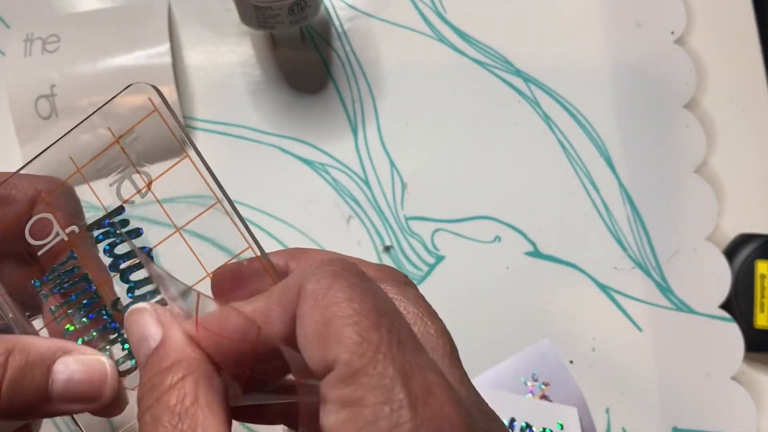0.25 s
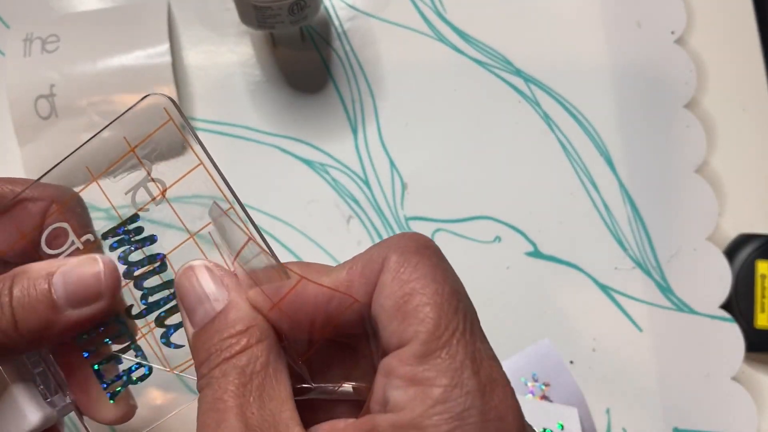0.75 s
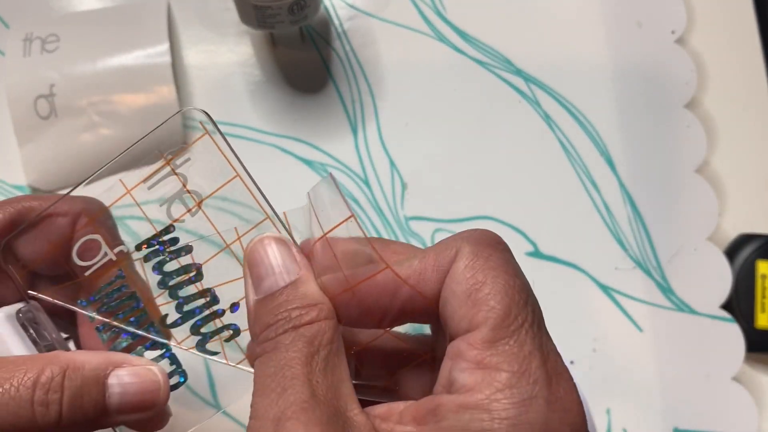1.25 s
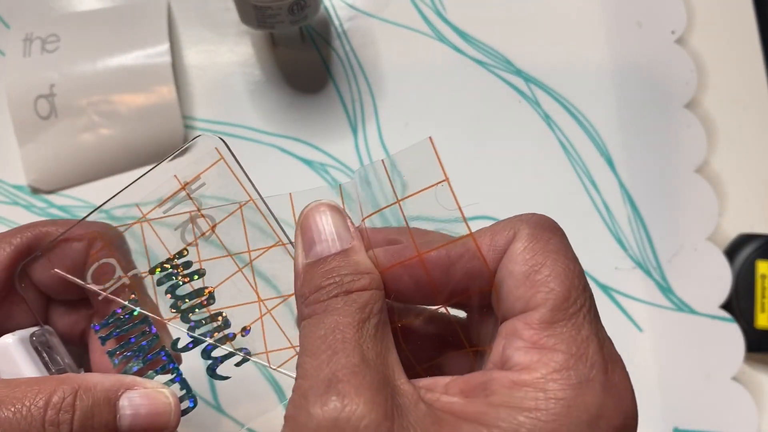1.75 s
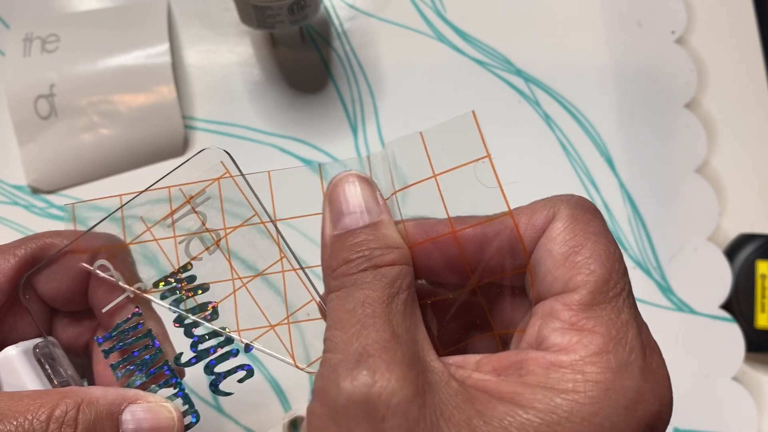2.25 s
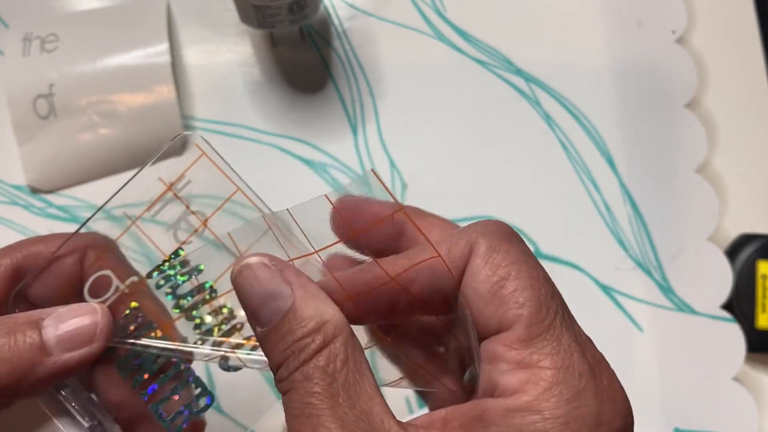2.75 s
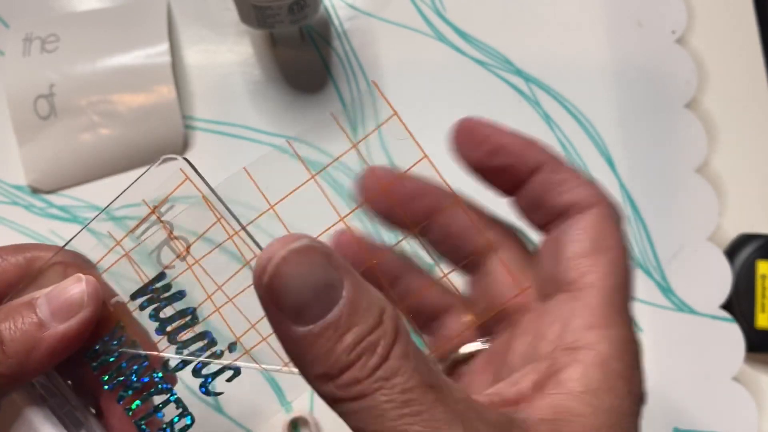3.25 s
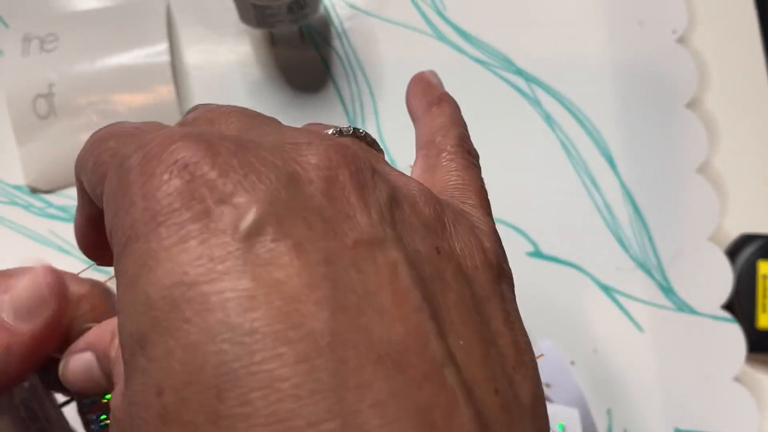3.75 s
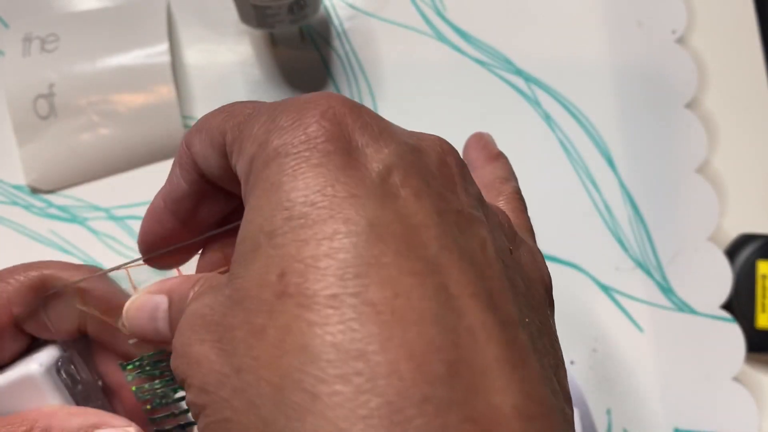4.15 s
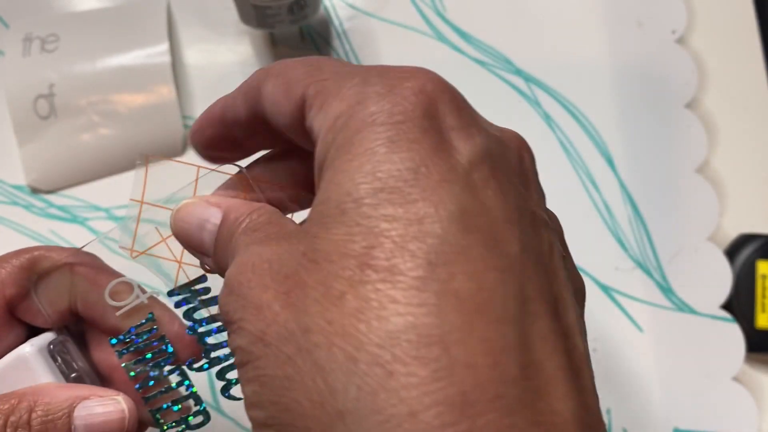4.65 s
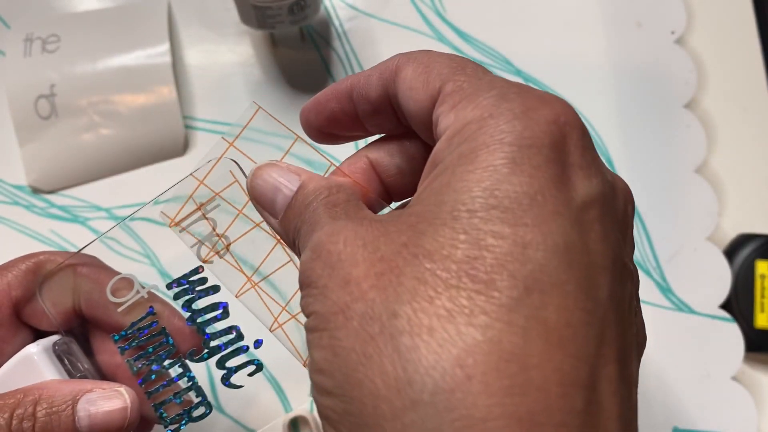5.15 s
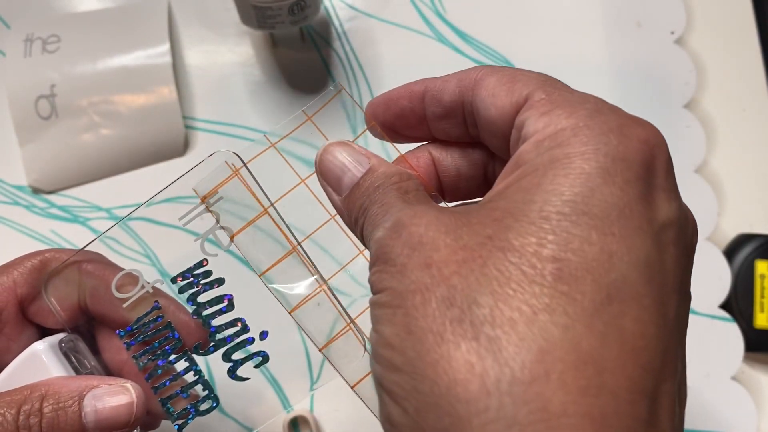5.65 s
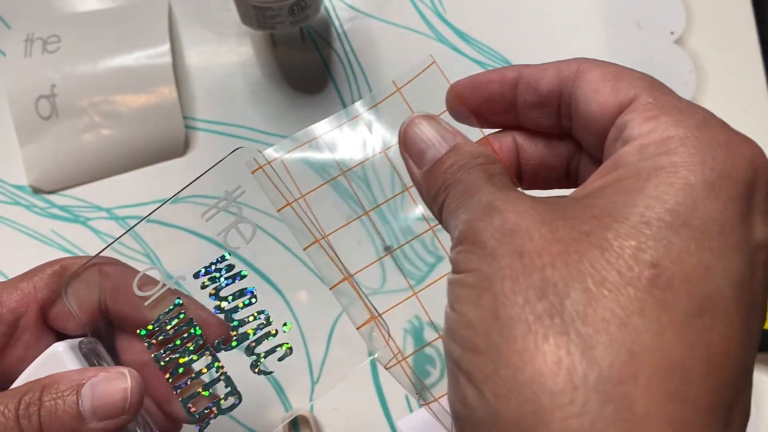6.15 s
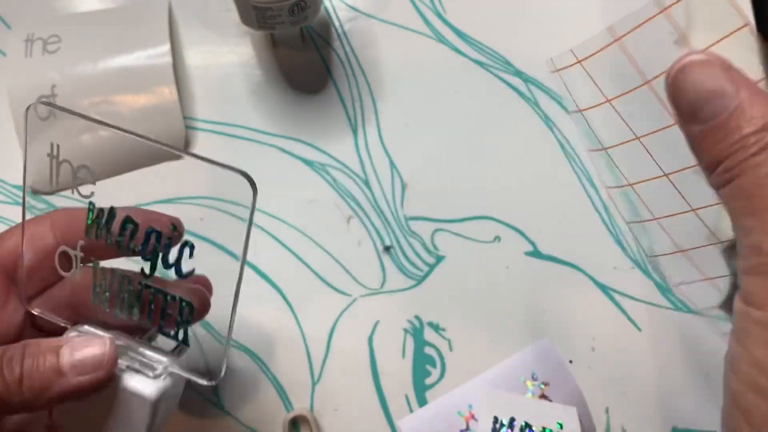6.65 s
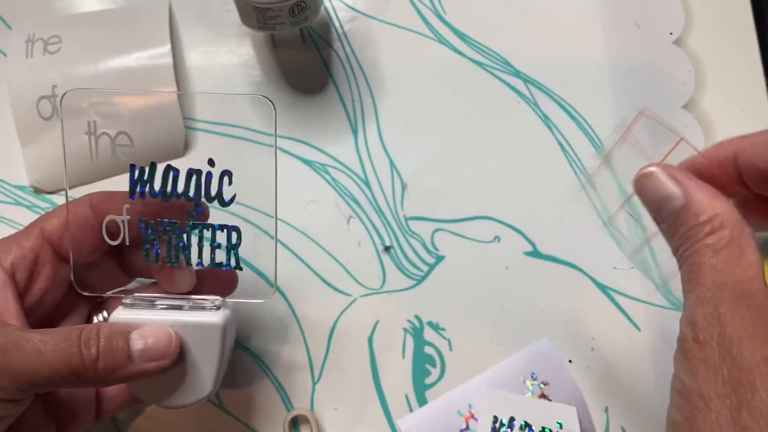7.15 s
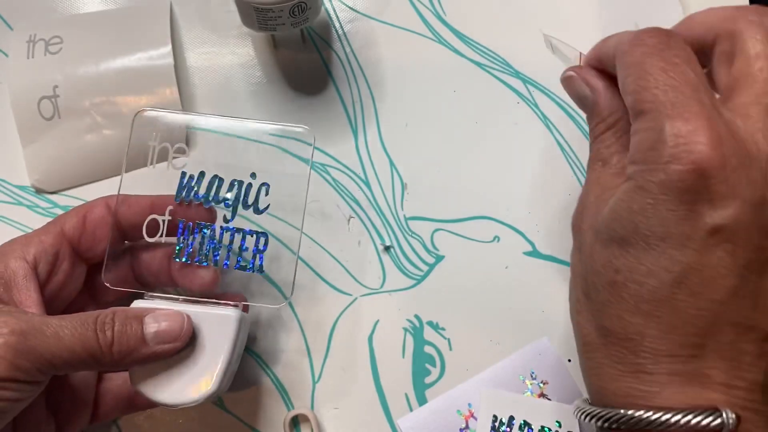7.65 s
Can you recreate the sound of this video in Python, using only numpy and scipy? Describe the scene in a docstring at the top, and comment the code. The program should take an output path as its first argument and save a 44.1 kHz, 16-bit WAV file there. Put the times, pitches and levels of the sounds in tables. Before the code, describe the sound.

Close, dry crackles and bright ticks as adhesive film is slowly pulled from hard plastic, with brief rustling scrapes and bumps over faint room hum.

```python
"""Sticky film peeled off a panel

Sticky plastic film is pulled slowly off a small clear panel close by, in stereo.
Glue lets go in a fine fizz (treble noise in tiny grains) and in snaps and ticks (short dying noise bursts).
Film scrapes and rustles (grainy noise through the panel's modes); fingers rumble and knock (low noise).
A quiet room hums behind (coloured noise, one narrow resonance) and answers with a short noise tail.
"""
import sys
import numpy as np
from scipy import signal
from scipy.fft import rfft, irfft, next_fast_len
from scipy.io import wavfile
from scipy.ndimage import uniform_filter1d

SR = 44100
rng = np.random.default_rng(int(sys.argv[2]) if len(sys.argv) > 2 else 0)


def wrap_up_sound(samples):
    """Save the sound to the file named by the first command line argument, as 16-bit audio."""
    columns = np.atleast_2d(samples).T
    # keep every value between -1 and 1, then stretch to whole-number steps
    tamed = np.clip(columns, -1, 1)
    steps = np.round(tamed * 32767).astype(np.int16)
    wavfile.write(sys.argv[1], SR, steps)


def convert_level_to_amplitude(level_db):
    """Map a level in decibels to its linear amplitude factor."""
    exponent = np.asarray(level_db, float) / 20
    return 10 ** exponent


N = 348831

# Room tone spectrum. Each row: frequency in Hz, relative density in dB per Hz.
AIR_TONE = [(32, -25.5), (62, 0), (92, -12), (125, -7.5), (250, -21), (700, -29), (2000, -40),
            (6500, -35.5), (12000, -48.5)]
AIR_DB, HUM_HZ, HUM_WIDTH_HZ, HUM_DB = -67, 241, 0.49, -81
# Likeness of left and right in room tone and tail, before the stereo is set; above 5.5 kHz they carry
# one sound. Each row: frequency in Hz, correlation (1 = same).
SIDE_LIKENESS = [(100, .97), (600, .5), (4900, .5), (5500, 1.0)]
# Modes of the stiff panel in cupped hands. Each row: frequency in Hz, width in Hz, gain in dB.
PANEL_MODES = [(650, 350, -5), (1250, 400, 0), (2600, 400, 4), (3800, 500, -2), (4700, 600, 0)]
# Treble colour of torn glue. Each row: frequency in Hz, gain in dB.
GLUE_TREBLE = [(4200, -14), (6000, 0), (9000, -7), (15600, -7), (16300, -35)]
# The steady pull. Each row: time in seconds, film scraping in dB, glue fizz in dB.
PULL = [(0.2, -66.5, -69), (0.55, -64.5, -57), (1.05, -72, -57.5), (1.5, -79.5, -50), (1.998, -70.5, -61),
        (2.269, -91, -72), (2.6, -79.5, -64), (3.0, -69.5, -58), (3.57, -94.5, -74), (3.87, -77.5, -70.5),
        (4.099, -65, -64.5), (4.6, -61.5, -63), (5.1, -75.5, -65.5), (5.9, -66.5, -64.5),
        (6.279, -80, -69.5), (6.6, -58, -62.5), (7.049, -88.5, -98), (7.649, -103, -74.5)]
# A hand regrips and the film creases. Each row: peak time in seconds, scraping in dB, fizz in dB,
# fingers shifting the panel in dB, time to fade 30 dB in seconds (a negative one leaves the row near silent).
GRIPS = [(0.029, -52.5, -48.5, -63, 0.14), (2.329, -60, -72, -53, 0.72), (2.389, -76, -82, -55, -0.04),
         (2.55, -56, -58, -65, -0.02), (3.189, -33.5, -51, -37.5, 0.03), (3.631, -50, -56.5, -47, 0.25),
         (3.94, -45, -62, -47.5, 0.034), (4.666, -48, -74, -37.5, 0.16), (4.87, -60, -72, -49, 0.37),
         (5.598, -63, -66, -48, -0.03), (6.371, -30, -50.5, -39, 0.11), (7.15, -45.5, -38, -52, 0.09),
         (7.75, -38, -48, -43.5, 0.1)]
GRIP_RISE_DB_PER_S = 420
# Glue letting go or a crease flipping. Each row: start in seconds, crack in dB, thump in dB above the crack,
# treble in dB above the crack, ring of the loose film in Hz.
SNAPS = [(0.0233, -22.5, -18, 13, 2530), (0.0796, -21, -15.5, 2.5, 7300), (0.5934, -31.5, -24.5, -2, 3660),
         (0.7963, -26, -23, 5, 6230), (0.893, -31, -16, -3, 3660), (1.3157, -36, -11.5, 12, 4000),
         (1.4, -31.5, -15.5, 0.5, 6200), (1.4175, -18, -18, 5, 5360), (1.6435, -37, -2, 14.5, 5300),
         (2.307, -36, 2, -16.5, 4040), (2.3812, -41.5, 2, -4.5, 526), (2.4946, -18, -12.5, -2, 3110),
         (2.836, -45.5, 4.5, -1, 293), (2.8519, -35.5, -6, -6, 3170), (3.0359, -39, -12.5, -9.5, 5340),
         (3.057, -33.5, -7.5, -5, 4450), (3.0735, -35, -10.5, -11, 3780), (3.17, -21, -19, -1.5, 5290),
         (3.6841, -38, -11.5, 5.5, 6000), (3.757, -26, -14, 7.5, 5940), (3.7961, -41.5, 1.5, -3.5, 376),
         (3.9183, -18.5, -14, -6, 3820), (3.924, -22, -4, -17, 5290), (4.0582, -44.5, -13.5, 0, 5700),
         (4.2097, -51, -9.5, -14, 4900), (4.633, -39, 1, 6.5, 2700), (4.9715, -38, -1.5, -10.5, 2740),
         (5.226, -30, -9.5, -1, 2530), (5.3588, -31.5, -3.5, 13, 6930), (5.5995, -35, -4, 4, 2580),
         (5.9829, -32.5, -3.5, -8, 2600), (6.326, -17, -9.5, 0.5, 7430), (6.3508, -34.5, 13.5, 7.5, 6700),
         (6.378, -15, -12.5, 2.5, 4720), (6.3815, -12, -26, 1, 6800), (6.4134, -31, -15.5, -6, 2570),
         (6.7231, -33, -7.5, -1.5, 3345), (7.131, -22, -24, 3.5, 6130), (7.1609, -25, -16, -9.5, 6150),
         (7.7324, -22, -16.5, 7.5, 4260), (7.883, -43, -14.5, -1, 3500), (7.903, -46, 0, -4.5, 2860)]
RING_MAX_WIDTH_HZ = 900
# Single threads of glue tearing, nearly all treble. Each row: start in seconds, treble in dB.
TICKS = [(0.396, -37), (0.429, -38.5), (0.4675, -38), (0.515, -36.5), (0.542, -33.5), (0.5659, -21.5),
         (1.189, -37.5), (1.275, -41.5), (1.3827, -29), (1.517, -37.5), (1.5409, -31), (1.55, -38.5),
         (1.675, -31.5), (1.702, -35.5), (1.713, -39.5), (1.8051, -31.5), (1.844, -39), (1.864, -36),
         (1.932, -32), (1.9831, -24.5), (2.3238, -26.5), (4.3699, -39), (4.693, -37.5), (4.984, -37),
         (6.367, -28.5), (7.716, -40.5)]
TICK_CRACK_DB, TICK_THUMP_DB, TICK_RING_HZ = -19, -14.5, 5600  # crack re treble, thump re crack
# Fingers or panel knocking dully. Each row: start in seconds, thump in dB, ring in Hz.
KNOCKS = [(0.872, -55.5, 1110), (0.9692, -50.5, 587), (1.758, -53, 1710), (1.992, -48, 700),
          (2.288, -49.5, 504), (2.4543, -45, 1080), (2.7068, -52, 270), (3.661, -42.5, 900),
          (4.963, -48.5, 1180), (5.684, -44.5, 1100), (6.0592, -25.5, 1110), (6.1239, -40, 920),
          (7.527, -44, 240)]
KNOCK_CRACK_DB, KNOCK_TREBLE_DB = -12, -3.5  # crack re thump, treble re crack
# Room decay. Each row: frequency in Hz, time to fall 60 dB in seconds.
ROOM_DECAY = [(250, 0.12), (4000, 0.21), (14000, 0.06)]
# The film drags and crumples. Each row: start in seconds, level in dB, length in seconds, loudest colour in Hz.
RUSTLES = [(3.108, -36, 0.053, 5000), (3.182, -32, 0.078, 4370), (3.589, -41.5, 0.05, 1940),
           (4.615, -43, 0.04, 2420), (6.297, -44, 0.037, 2640), (6.63, -52.5, 0.11, 1970),
           (6.8, -54, 0.044, 4130), (6.877, -59.5, 0.041, 1400), (7.069, -49.5, 0.053, 1930),
           (7.682, -50, 0.046, 2400), (7.767, -35, .022, 3870)]
# Phase between left and right. Each row: frequency in Hz, lead of the left in radians.
LEFT_LEAD = [(80, 0), (950, .4), (2400, -.8), (4600, -.9), (5500, -np.pi)]
# Balance between left and right. Each row: frequency in Hz, left minus right in dB.
LEFT_LOUDER = [(100, .2), (1600, 1.8), (5500, 0)]


def evened(x):
    """Scales to rms 1."""
    return x / np.sqrt(np.mean(x ** 2) + 1e-20)


def read(points, hz):
    """Reads a table on a log-frequency axis."""
    f, value = np.transpose(points)
    return np.interp(np.log(hz + 1), np.log(f + 1), value)


def coloured(x, points):
    """Filters by a table of dB over frequency."""
    size = x.shape[-1]
    hz = np.fft.rfftfreq(size, 1 / SR)
    return irfft(rfft(x) * convert_level_to_amplitude(read(points, hz)), size)


def band(x, low_hz, high_hz):
    """Causal band-pass."""
    sos = signal.butter(2, [low_hz, high_hz], "band", fs=SR, output="sos")
    return signal.sosfilt(sos, x)


def ring(x, hz, width_hz):
    """One damped mode of gain 1."""
    r = np.exp(-np.pi * width_hz / SR)
    return 2 * signal.lfilter([1 - r], [1, -r * np.exp(2j * np.pi * hz / SR)], x).real


def diffuse(pair):
    """Mixes two unrelated sounds into a left and right as alike as SIDE_LIKENESS says."""
    hz = np.fft.rfftfreq(pair.shape[1], 1 / SR)
    same = np.clip(read(SIDE_LIKENESS, hz), -1, 1)
    a, b = rfft(pair)
    return irfft([a, same * a + np.sqrt(1 - same ** 2) * b], pair.shape[1])


def air():
    """Room tone with a faint wavering hum, noise through a very narrow resonance."""
    tone = evened(coloured(diffuse(rng.standard_normal((2, N))), AIR_TONE))
    hum = evened(ring(rng.standard_normal(N), HUM_HZ, HUM_WIDTH_HZ))
    return convert_level_to_amplitude(AIR_DB) * tone + convert_level_to_amplitude(HUM_DB) * hum


def wander(rms_db):
    """Uneven motion: a gain that drifts at random, several times a second."""
    drift = uniform_filter1d(rng.standard_normal(N), size=2500)
    return convert_level_to_amplitude(rms_db * evened(uniform_filter1d(drift, size=2500)))


def grains(per_s, spread_db, smooth, peak_s):
    """Tiny slips of random size over a smooth noise; each swells for peak_s, then dies."""
    size_db = spread_db * np.minimum(rng.exponential(1, N), 4)
    slips = (rng.random(N) < per_s / SR) * convert_level_to_amplitude(size_db)
    t = np.arange(2048) / (peak_s * SR)
    clumps = signal.oaconvolve(slips, t * np.exp(-t))[:N]
    return evened(evened(clumps) + smooth) * rng.standard_normal(N)


def panel(x, drift_db=0):
    """Panel and cupped hands ring in a few broad modes; with drift_db moving hands swell each alone."""
    out = 0
    for hz, width_hz, db in PANEL_MODES:
        drift = wander(drift_db) if drift_db else 1
        out = out + convert_level_to_amplitude(db) * drift * ring(x, hz, width_hz)
    return band(out, 200, 6000)


def grips():
    """Gains of scrape, fizz and fingers: each grip swells fast and fades at its own speed."""
    t, out = np.arange(N) / SR, np.zeros((3, N))
    for s, *levels_db, fade_s in GRIPS:
        near = slice(max(0, round((s - .25) * SR)), round((s + 3 * fade_s) * SR))
        since_s = t[near] - s
        shape_db = np.minimum(GRIP_RISE_DB_PER_S * since_s, -30 * since_s / fade_s)
        out[:, near] += convert_level_to_amplitude(np.array(levels_db)[:, None] + shape_db)
    return out


def peel():
    """Scrape and fizz follow the pull and the grips; finger rumble only the grips."""
    s, *levels_db = np.transpose(PULL)
    scrape_pull, fizz_pull = (convert_level_to_amplitude(np.interp(np.arange(N) / SR, s, db)) for db in levels_db)
    scrape_grip, fizz_grip, finger_grip = grips()
    scrape = evened(panel(grains(per_s=260, spread_db=1.8, smooth=.8, peak_s=.002)))
    # the steady pull is smoother
    glide = evened(panel(grains(per_s=300, spread_db=1.5, smooth=1.0, peak_s=.003), drift_db=4.5))
    torn = grains(per_s=220, spread_db=.8, smooth=3.5, peak_s=0.00021)
    fizz = evened(band(coloured(torn, GLUE_TREBLE), 4500, 17000))
    # the panel shudders, and the scrape catches on each swing
    rub = rng.standard_normal(N)
    wobble = evened(band(band(rub, 50, 90), 50, 90))
    scrape = evened(scrape * convert_level_to_amplitude(2.2 * wobble))
    fingers = evened(wobble + 0.72 * evened(band(rub, 90, 200)) + .3 * band(scrape, 250, 1500))
    film = scrape_pull * glide + scrape_grip * scrape + (fizz_pull + fizz_grip) * fizz
    return wander(0.77) * film + finger_grip * fingers


def burst(thump_db, treble_db, hz):
    """One short dying noise burst: a crack through the ringing film, a thump and a brief treble tick."""
    base_fall_s, quicken, ring_db = 0.0035, 0.73, 0.5  # quicken: dB shorter per dB of treble
    flutter_db, flutter_fall_s, sides_db = -24, 0.017, 3.5
    t = np.arange(4096) / SR
    # time to fall 10 dB: bright bursts are short, dull and low ones last
    fall_s = base_fall_s * convert_level_to_amplitude(-quicken * np.clip(treble_db, -10, 10)) * max(1, 800 / hz)
    rise = rng.standard_normal(len(t)) * np.minimum(t / (0.28 * fall_s), 1)
    flutter = convert_level_to_amplitude(flutter_db - 10 * t / flutter_fall_s)  # the film flutters on
    body = rise * (convert_level_to_amplitude(-10 * t / fall_s) + flutter)

    width_hz = min(RING_MAX_WIDTH_HZ, hz)
    rung = convert_level_to_amplitude(ring_db) * evened(ring(ring(body, hz, width_hz), hz, width_hz))
    low = hz < 1700  # a low ring joins the thump, a high one the crack
    thump_top_hz = min(1500, 2 * hz)
    crack = evened(band(body, 2200, 6000)) + rung * (not low)
    thump = evened(band(band(body, 120, thump_top_hz), 120, thump_top_hz)) + rung * low
    tick = band(coloured(rise * convert_level_to_amplitude(-14 * t / fall_s), GLUE_TREBLE), 5000, 17000)

    # each part to a peak short-time rms of 1
    crack, thump, tick = (part / np.sqrt(uniform_filter1d(part ** 2, size=130).max())
                          for part in (crack, thump, tick))
    # treble is a fixed amount louder on a randomly chosen side
    sides = convert_level_to_amplitude(sides_db * rng.choice([-1, 1]) * np.array([[.5], [-.5]]))
    return crack + convert_level_to_amplitude(thump_db) * thump + convert_level_to_amplitude(treble_db) * sides * tick


def bursts(rows):
    """Sets bursts in time; rows as in SNAPS."""
    out = np.zeros((2, N + 4096))
    for s, crack_db, thump_db, treble_db, hz in rows:
        start = round(s * SR)
        out[:, start:start + 4096] += convert_level_to_amplitude(crack_db) * burst(thump_db, treble_db, hz)
    return out[:, :N]


def snaps():
    """Glue lets go or a crease flips: the loose film rings, well damped."""
    return bursts(SNAPS)


def room(x):
    """A noise tail, each band dying at its own speed, fading in over its first 17 ms."""
    hz, t, z = signal.stft(diffuse(rng.standard_normal((2, SR // 2))), SR, nperseg=256)
    decay = convert_level_to_amplitude(-60 * t / read(ROOM_DECAY, hz)[:, None])
    tail = signal.istft(z * decay, SR, nperseg=256)[1]
    tail = tail * np.clip(np.arange(tail.shape[1]) / (0.017 * SR), 0, 1)
    return signal.fftconvolve(x[None], tail / np.linalg.norm(tail[0]), axes=1)[:, :N]


def ticks():
    """Single threads of glue tear: bursts that are nearly all treble."""
    return bursts([(s, db + TICK_CRACK_DB, TICK_THUMP_DB, -TICK_CRACK_DB, TICK_RING_HZ) for s, db in TICKS])


def knocks():
    """Fingers or panel knock: bursts led by the thump."""
    return bursts([(s, db + KNOCK_CRACK_DB, -KNOCK_CRACK_DB, KNOCK_TREBLE_DB, hz) for s, db, hz in KNOCKS])


def rustles():
    """Short swells of rough grains through the panel, each with its own colour."""
    rough, out = grains(per_s=800, spread_db=2.0, smooth=1.0, peak_s=0.0008), np.zeros(N)
    for s, db, length_s, hz in RUSTLES:
        start, swell = round(s * SR), np.hanning(round(length_s * SR))
        span = slice(start, start + len(swell))
        drag = rough[span]
        colour = evened(ring(drag, hz, hz / 3))
        out[span] += convert_level_to_amplitude(db) * swell * evened(evened(panel(drag)) + 1.3 * colour)
    return out


def scene():
    """Near sound, its room, and the room tone."""
    near = peel() + snaps() + ticks() + knocks() + rustles()
    return near + convert_level_to_amplitude(-19) * room(near.mean(0)) + air()


def low_pass(x):
    """Removes everything above the highest recorded frequency."""
    return signal.sosfilt(signal.butter(12, 16990, fs=SR, output="sos"), x)


def record(dry):
    """Sets phase and balance of left and right by frequency; above 5.5 kHz they are opposite in sign."""
    size = next_fast_len(N + 2048)
    hz = np.fft.rfftfreq(size, 1 / SR)
    half = convert_level_to_amplitude(read(LEFT_LOUDER, hz) / 2)
    left_right = np.array([half * np.exp(1j * read(LEFT_LEAD, hz)), 1 / half])
    mix = irfft(rfft(dry, size) * left_right, size)[:, :N]
    return low_pass(mix)


dry = scene()
out = record(dry)
wrap_up_sound(out)
```